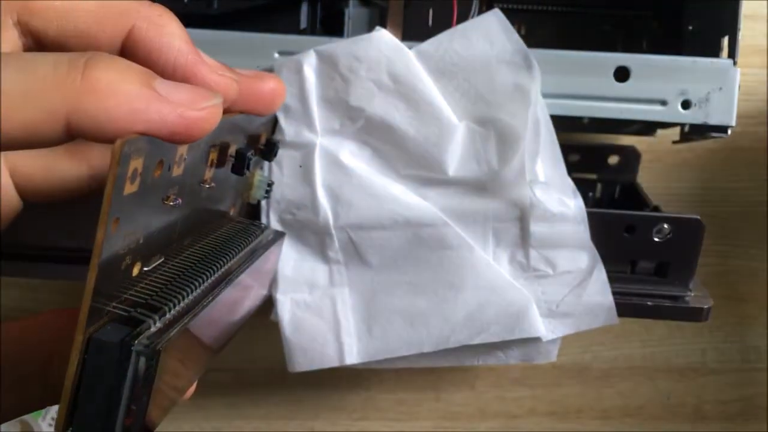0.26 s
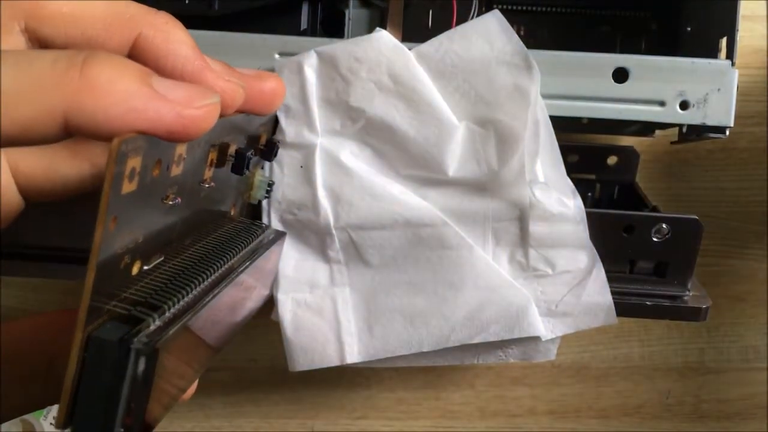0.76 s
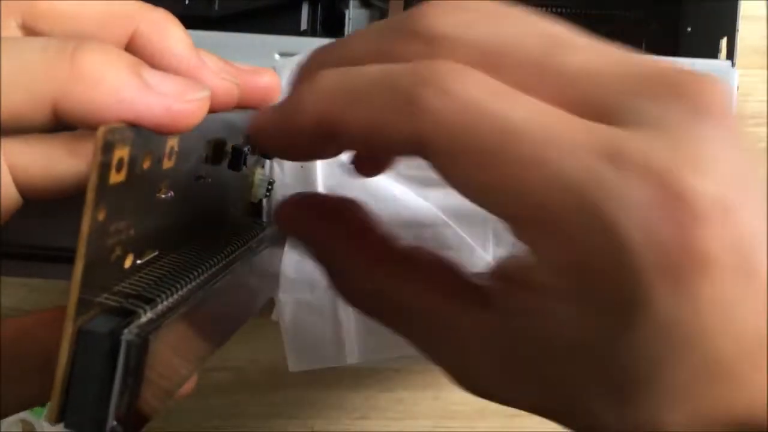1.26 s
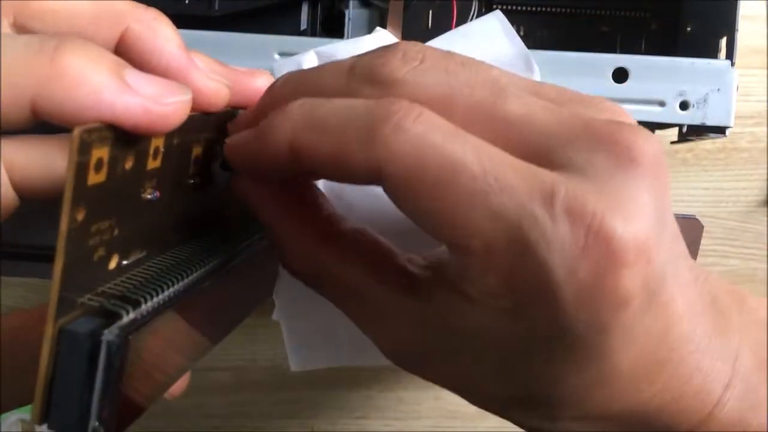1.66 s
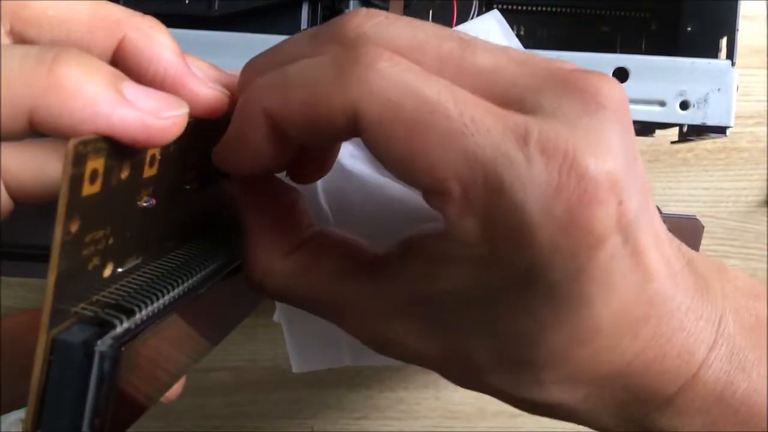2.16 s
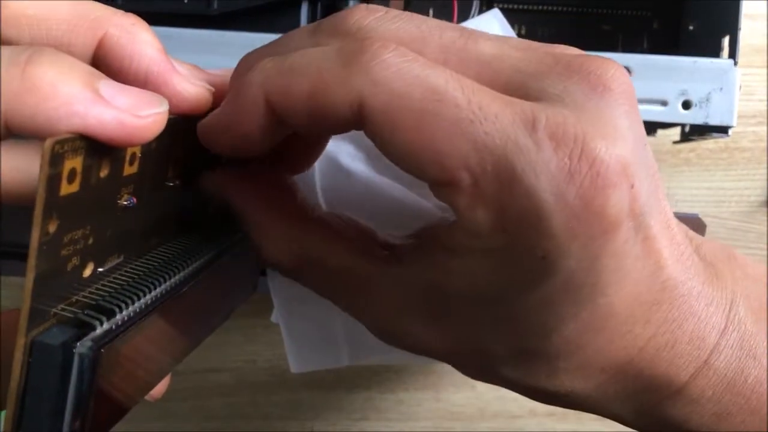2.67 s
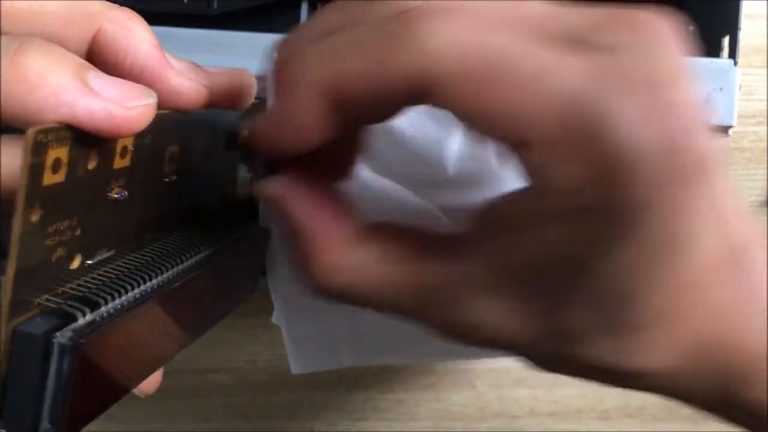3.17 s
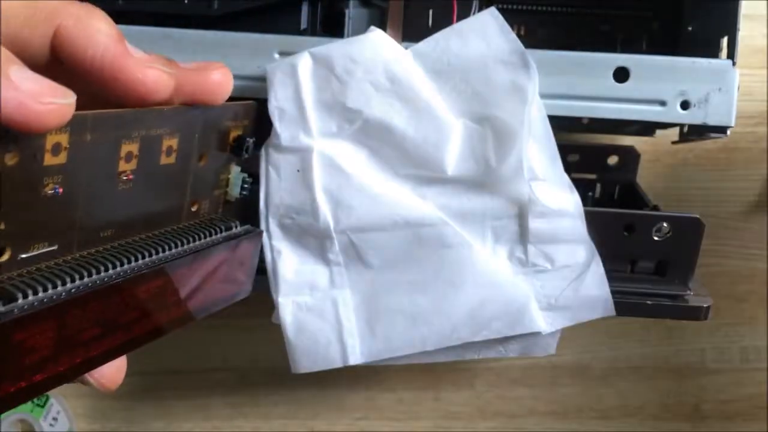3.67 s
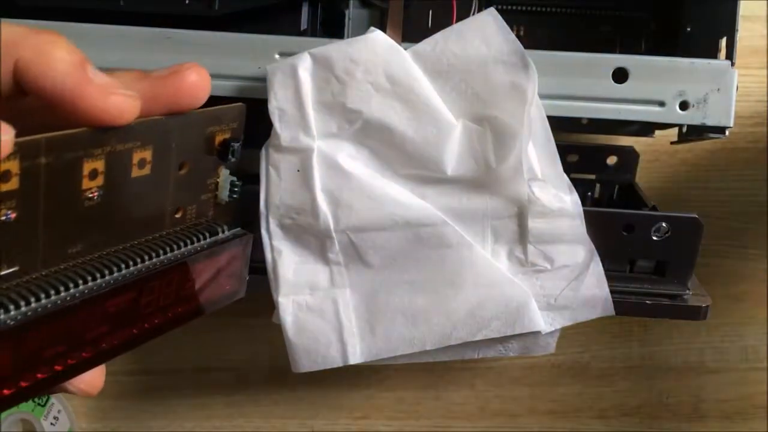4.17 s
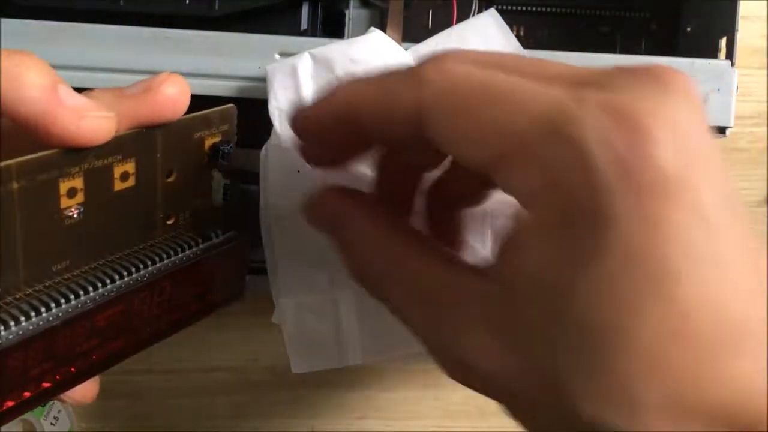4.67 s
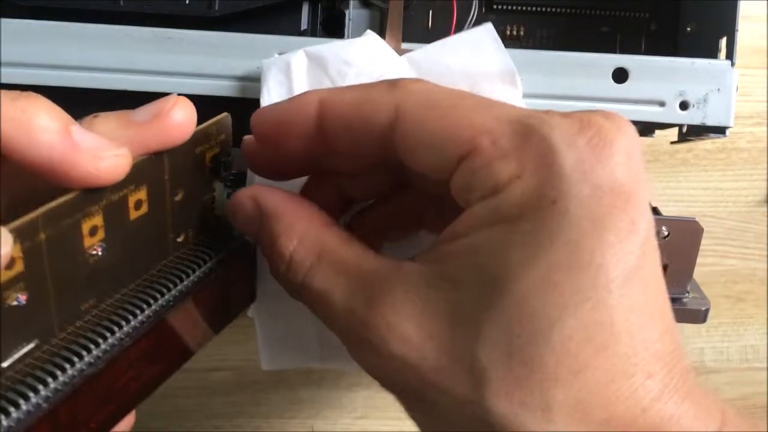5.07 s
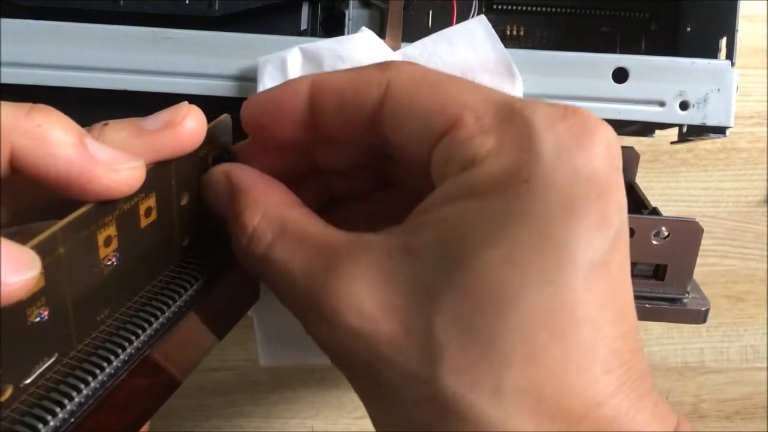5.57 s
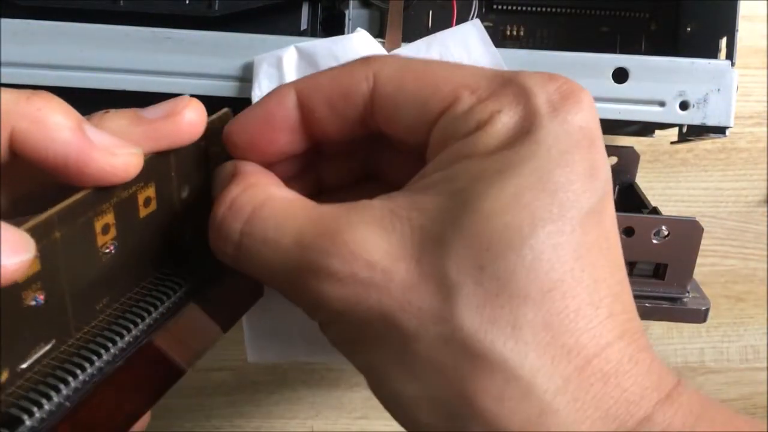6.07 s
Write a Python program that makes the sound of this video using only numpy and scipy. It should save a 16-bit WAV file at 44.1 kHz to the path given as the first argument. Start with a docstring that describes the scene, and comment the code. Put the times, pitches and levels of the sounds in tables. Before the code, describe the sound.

Fingers work a small switch on a circuit board: a hard double snap, faint ticks and creaks, then a click and knock over low hum.

```python
"""A small switch on the circuit board of an opened appliance, worked by fingers close by.
A hard double snap excites the modes of the sheet-metal chassis by impact. The switch then ticks as its
contacts strike, its plastic creaks by stick-slip friction, and skin brushes the board with a grainy hiss.
Near the end a click is followed by a dull knock of the hand-damped board.
The room is small and quiet, with a low, wavering hum."""
import sys
import numpy as np
from scipy import signal
from scipy.fft import rfft, irfft, next_fast_len
from scipy.io import wavfile

SR = 44100
rng = np.random.default_rng(int(sys.argv[2]) if len(sys.argv) > 2 else 0)


def materialize(psi):
    """Save the field psi as 16-bit PCM at rate SR to the path in sys.argv[1].

    A 1-D psi becomes a single channel; in a 2-D psi each row is a channel.
    """
    bounded = np.clip(np.atleast_2d(psi).T, -1, 1)
    quanta = np.round(bounded * 32767).astype(np.int16)
    wavfile.write(sys.argv[1], SR, quanta)


N = 278712
TIME = np.arange(N) / SR

# Envelope of the low hum: t/s, gain/dB
HUM_ENVELOPE = [(0.0, -43), (0.54, -50.5), (1.02, -46), (1.14, -51), (1.5, -46), (2.04, -49.5),
                (3.42, -41.5), (3.66, -46.5), (3.9, -39.5), (4.02, -48), (4.32, -38), (4.56, -48.5),
                (4.68, -43.0), (5.1, -50), (5.7, -43), (6.32, -47.5)]
# Spectra of the room's rumble and hiss: f/Hz, relative level/dB
RUMBLE_SPECTRUM = [(20, -49), (36, -15.5), (48, -1.5), (58, -1.5), (70, 3), (88, -4), (103, -10.5),
                   (135, -20.5), (160, -14.5), (225, -23), (280, -21.5), (380, -30.5), (520, -52)]
HISS_SPECTRUM = [(150, -5.5), (400, -1.5), (700, -1.5), (1100, -6), (1900, -8.5), (2500, -12.5),
                 (3500, -15.5), (4900, -15), (5900, -8), (7500, -24), (9500, -18.5), (10400, -27),
                 (11800, -13.5), (15500, -13.5)]
# Thin steady tones: f/Hz, level/dB
STEADY_TONES = [(247.6, -73.5), (1820, -83.5), (2169, -86.5), (6029, -99)]
# Gaussian swells of a faint whine: centre t/s, width/s, level/dB
WHINE_SWELLS = [(1.93, .15, -76.5), (2.36, .08, -69.5), (3.18, 0.03, -70.5)]
# Impacts on the chassis: t/s, crack level/dB, tilt/(dB/octave), decay time/s, ring gain/dB
SNAP_IMPACTS = [(1.0198, -25, -2.5, 0.006, -37.5), (1.035, -25.5, 8, 0.0039, -51.5),
                (1.0562, -31.5, 3, 0.0069, -48.5), (1.0684, -32, -3, 0.012, -48.5)]
# Spectrum of a snap's crack: f/Hz, relative level/dB
CRACK_SPECTRUM = [(30, -28), (100, 11.5), (400, -1.5), (1500, -2.5), (2300, -7), (3200, 3), (4400, 0.5),
                  (5000, -9.5), (6600, -3.5), (10500, -6.5), (12100, 5.5), (13000, -3), (14300, 8),
                  (15000, -4), (16000, -13)]
# Modes of the chassis: f/Hz, relative level/dB, T60/s
CHASSIS_MODES = [(116.5, -2.5, 0.37), (158.7, -0.5, 0.24), (210, -15, 0.15), (280.4, 10.5, 0.27),
                 (310, -1, 0.11), (390, 5.5, 0.096), (563, -12, 0.33), (590, -11, 0.21), (763, -3.5, 0.17),
                 (777, -3, 0.18), (902, -22, 0.18), (1072, -5.5, 0.26), (1236, -6, 0.2), (1268, -4, 0.14),
                 (1342, -7, 0.22), (1490, -3, 0.13), (1690, -2.5, 0.14), (1794, -1, 0.15),
                 (1930, -0.5, 0.13), (3676, -6.5, 0.2), (4400, -10.5, 0.13), (11130, -8, 0.12),
                 (12100, -9, 0.065), (12800, -8, 0.12), (14100, -7, .08)]
# Clicks of the switch: t/s, level/dB, tilt/(dB/octave), decay time/s, ring f/Hz, ring level/dB
SWITCH_TICKS = [(1.113, -47, -7, 0.0012, 3700, -57), (2.491, -55, -3, 0.0008, 4240, -51),
                (2.9191, -34.5, -3, .0005, 3100, -33), (2.9192, -39, 7, 0.00062, 4240, -29),
                (3.388, -53.5, -4, 0.0024, 2750, -37), (3.4260, -52, -1.5, 0.00046, 3570, -49),
                (3.7807, -47, -4, 0.0018, 4000, -41.5), (6.1012, -27.5, 9, .00064, 2900, -40),
                (6.1149, -35, -2, 0.0012, 2900, -31.5), (6.1667, -54, -3, .0008, 3500, -50)]
# Spectrum of a tick or slip: f/Hz, relative level/dB
TICK_SPECTRUM = [(200, -10), (1000, -8.5), (1800, -13.5), (3100, -6), (4400, -4), (5000, -5), (5900, -5.5),
                 (6900, 0), (8100, -14), (9200, 1), (10600, -14), (11900, 1), (13800, -4), (16000, 0.5)]
# Strokes of skin on the board: centre t/s, duration/s, level/dB, tilt/(dB/octave)
SKIN_STROKES = [(1.45, 0.059, -66, 0.5), (2.421, 0.049, -64.5, 3), (4.539, 0.049, -58.5, 7.5),
                (4.858, 0.17, -70, 6), (5.043, 0.51, -67, -2), (5.493, 0.012, -56.5, 1.5),
                (5.598, 0.043, -62, -0.5), (5.689, 0.03, -63.5, -2.5), (5.776, 0.13, -71, 1),
                (5.957, .06, -67, 11), (6.121, .62, -68, -4.5), (6.247, 0.061, -62, 1.5)]
# Spectrum of rubbing skin: f/Hz, relative level/dB
SKIN_SPECTRUM = [(200, -20.5), (1000, 6), (2000, 1.5), (3300, 4.5), (5000, -1), (8000, -4), (13000, 1.5),
                 (16000, -18)]
# Spans in which the fingertips grip the switch: start t/s, end t/s
GRIP_SPANS = [(1.9, 2.95), (4.75, 6.7)]
# Single slips of plastic under a fingertip: t/s, level/dB
SINGLE_SLIPS = [(1.986, -45), (1.9964, -54), (2.1346, -50.5), (2.3267, -43), (2.3511, -33), (2.7685, -48),
                (2.9174, -44), (4.537, -41), (5.4984, -44.5)]
# Creaks, as runs of slips: start t/s, duration/s, approximate slip period/s, level/dB
SLIP_RUNS = [(2.32, .022, .0055, -53), (2.5776, .0145, .0029, -37.5), (2.907, 0.0045, .0033, -49.5)]
# Knocks of the board: t/s, gain/dB
BOARD_KNOCKS = [(4.149, -53.5), (6.116, -32)]
# The board's first heavy swing: delay/s, f/Hz, Gaussian width/s, relative level/dB
BOARD_SWING = (0.004, 299, 0.002, 7.1)
# Modes of the board: f/Hz, relative level/dB, T60/s
BOARD_MODES = [(213, -13, 0.13), (308, 0.5, 0.07), (321, 7.5, 0.053), (374, -7, 0.051), (525, -11.5, 0.073),
               (1046, -18, .018), (1053, -3.5, 0.021), (1370, -9, 0.02), (1720, -12.5, 0.028)]
# Reverberation time of the room: f/Hz, T60/s
REVERB_TIMES = [(200, 0.16), (1500, 0.12), (4000, 0.12), (9000, 0.11), (16000, 0.019)]


def amp(db):
    return 10 ** (np.asarray(db) / 20)


def unit_rms(x):
    return x / np.sqrt(np.mean(x ** 2) + 1e-20)


def at_hz(points, hz):
    """Interpolation on a logarithmic frequency axis."""
    f, value = np.transpose(points)
    return np.interp(np.log(hz + 1), np.log(f + 1), value)


def add(mix, start, sound):
    """Superposition: a sound joins the mix at its start time, in seconds."""
    part = mix[max(round(start * SR), 0):][:len(sound)]
    part += sound[:len(part)]


def colour(x, spectrum, tilt=0):
    """Minimum-phase filtering to a spectrum, tilted in dB per octave above 1 kHz."""
    size = 2 * next_fast_len(len(x))
    hz = np.fft.rfftfreq(size, 1 / SR)
    gain_db = at_hz(spectrum, hz) + tilt * np.log2(np.maximum(hz, 1000))
    cepstrum = irfft(np.log(amp(gain_db)))
    cepstrum[1:size // 2] *= 2  # folding the cepstrum makes the filter causal
    cepstrum[size // 2 + 1:] = 0
    return irfft(rfft(x, size) * np.exp(rfft(cepstrum)))[:len(x)]


def drift(rate_hz):
    """Low-pass noise: a slow random wander of rms 1."""
    hz = np.fft.rfftfreq(N, 1 / SR)
    return unit_rms(irfft(rfft(rng.standard_normal(N)) * np.exp(-(hz / rate_hz) ** 2), N))


def click(spectrum, tilt, decay_s, size=2048):
    """Contact transient: an edge and exponentially decaying noise, with the energy of 2 ms at rms 1."""
    t = np.arange(size) / SR
    burst = rng.choice([-1., 1.], size) * np.exp(-t / decay_s)
    burst[0] = 3  # the first contact stands out
    burst = colour(burst, spectrum, tilt)
    return burst / np.linalg.norm(burst) * np.sqrt(.002 * SR)


def ring(modes, rise_s, scatter_turns):
    """Free vibration: damped modes of alternating sign, each with a random phase offset."""
    t = np.arange(SR // 2) / SR
    vibration = np.zeros(len(t))
    for k, (hz, db, t60) in enumerate(modes):
        phase = 2 * np.pi * (hz * t + scatter_turns * rng.random())
        vibration += (-1) ** k * amp(db - 60 * t / t60) * np.sin(phase)
    return vibration * (1 - np.exp(-t / rise_s))


def tone(hz, waver_rad):
    """Phase modulation: a slightly wavering sinusoid of rms 1."""
    return np.sqrt(2) * np.sin(2 * np.pi * hz * TIME + waver_rad * drift(rate_hz=4.8))


def background():
    """Superposed tones and filtered noise: hum, rumble, thin tones, a swelling whine and soft hiss."""
    rumble = unit_rms(colour(rng.standard_normal(N), RUMBLE_SPECTRUM))
    bass = signal.sosfiltfilt(signal.butter(4, 125, fs=SR, output="sos"), rumble)
    upper_rumble = amp(-47) * (rumble - bass)
    envelope = amp(np.interp(TIME, *np.transpose(HUM_ENVELOPE)))
    hum = envelope * (amp(-2.5) * unit_rms(bass) + amp(-3) * tone(hz=70, waver_rad=0.3))
    tones = sum(amp(db) * tone(hz, waver_rad=.4) for hz, db in STEADY_TONES)
    swells = sum(amp(db) * np.exp(-.5 * ((TIME - centre) / width) ** 2)
                 for centre, width, db in WHINE_SWELLS)
    whine = (amp(-86) + swells) * tone(hz=691, waver_rad=0.97)
    hiss = amp(-66) * unit_rms(colour(rng.standard_normal(N), HISS_SPECTRUM))
    flicker = amp(1.23 * drift(rate_hz=38))
    return hum + upper_rumble + tones + whine + hiss * flicker


def chassis_snaps(buzz_over_ring_db=6):
    """Impact excitation: each blow cracks, sets loose parts buzzing and rings the chassis modes."""
    out = np.zeros(N)
    for start, crack_db, tilt, decay_s, ring_db in SNAP_IMPACTS:
        add(out, start, amp(crack_db) * click(CRACK_SPECTRUM, tilt, decay_s))
        buzz = click(CRACK_SPECTRUM, tilt=-5.5, decay_s=0.032, size=8192)
        add(out, start, amp(ring_db + buzz_over_ring_db) * buzz)
        add(out, start, amp(ring_db) * ring(CHASSIS_MODES, rise_s=0.0092, scatter_turns=0.11))
    return out


def switch_ticks(t60_s=0.0067):
    """Damped resonance: each sharp contact in the switch rings a small part for an instant."""
    out = np.zeros(N)
    for start, db, tilt, decay_s, ring_hz, ring_db in SWITCH_TICKS:
        add(out, start, amp(db) * click(TICK_SPECTRUM, tilt, decay_s))
        add(out, start, ring([(ring_hz, ring_db, t60_s)], rise_s=0.00022, scatter_turns=0))
    return out


def skin_brushes(grain_db=3, flutter_db=2.5):
    """Sliding friction: skin on the board makes a grainy hiss that wavers with the finger's pressure."""
    out = np.zeros(N)
    for centre, duration, db, tilt in SKIN_STROKES:
        size = round(duration * SR)
        grains = rng.standard_normal(SR) * amp(grain_db * rng.exponential(1, SR).clip(0, 4))
        hiss = unit_rms(colour(grains[:size], SKIN_SPECTRUM, tilt))
        add(out, centre - duration / 2, amp(db) * hiss * signal.windows.tukey(size, .7))
    return out * amp(flutter_db * drift(rate_hz=30))


def grip_crackle(slips_per_s=45, spread_db=1.5):
    """Micro-slip: gripping skin gives way in tiny steps, timed as a Poisson process."""
    held = sum((TIME > start) & (TIME < end) for start, end in GRIP_SPANS)
    onsets = held * (rng.random(N) < slips_per_s / SR)
    strengths = amp(spread_db * rng.exponential(1, N).clip(0, 4))
    slip = click(TICK_SPECTRUM, tilt=5, decay_s=0.00028)
    return amp(-64.5) * signal.oaconvolve(onsets * strengths, slip)[:N]


def plastic_creaks(jitter_periods=.05, spread_db=1.0):
    """Stick-slip friction: plastic under a fingertip lets go once, or in a nearly periodic run."""
    out, slips = np.zeros(N), list(SINGLE_SLIPS)
    for start, duration, period, db in SLIP_RUNS:
        for onset in np.linspace(start, start + duration, round(duration / period) + 1):
            late, loud = rng.standard_normal(2)
            slips.append((onset + jitter_periods * period * late, db + spread_db * loud))
    for onset, db in slips:
        add(out, onset, amp(db) * click(TICK_SPECTRUM, tilt=7.5, decay_s=0.00098))
    return out


def board_knocks():
    """Damped vibration: the hand-damped board swings once, heavily, and rings briefly in its low modes."""
    out = np.zeros(N)
    delay, hz, width, swing_db = BOARD_SWING
    t = np.arange(SR // 2) / SR - delay
    swing = amp(swing_db) * np.sin(2 * np.pi * hz * t) * np.exp(-.5 * (t / width) ** 2)
    for start, db in BOARD_KNOCKS:
        add(out, start, amp(db) * (swing + ring(BOARD_MODES, rise_s=0.00044, scatter_turns=0.077)))
    return out


def room(x, rise_s=0.00033):
    """Reverberation: convolution with a small room's diffuse tail, whose treble dies first."""
    hz, t, noise = signal.stft(rng.standard_normal(SR // 2), SR, nperseg=256)
    decay = amp(-60 * t / at_hz(REVERB_TIMES, hz)[:, None])
    _, tail = signal.istft(noise * decay, SR, nperseg=256)
    tail *= 1 - np.exp(-np.arange(len(tail)) / SR / rise_s)
    return signal.fftconvolve(x, tail / np.linalg.norm(tail))[:N]


def scene():
    """Direct and reverberant fields: the close sources outweigh their reflections, over the hum."""
    ambience, snaps, knocks = background(), chassis_snaps(), board_knocks()
    handling = skin_brushes() + switch_ticks() + plastic_creaks() + grip_crackle()
    reverb = room(amp(-13) * snaps + amp(-15) * handling + amp(-10) * knocks)
    return (snaps + handling + knocks + reverb + ambience)[None]


def record(dry, cutoff_hz=16000):
    """Band limiting: a linear-phase low-pass filter removes the highest treble."""
    lowpass = signal.firwin(301, cutoff_hz, window=("kaiser", 8), fs=SR)
    return signal.oaconvolve(dry, lowpass[None], "same")


dry = scene()
out = record(dry)
materialize(out)
```